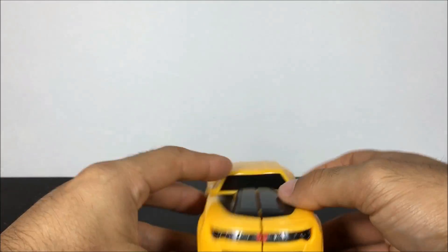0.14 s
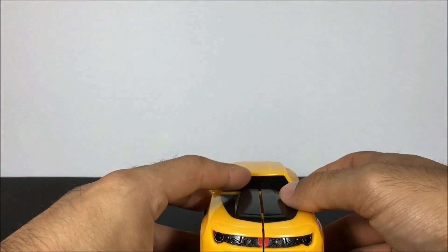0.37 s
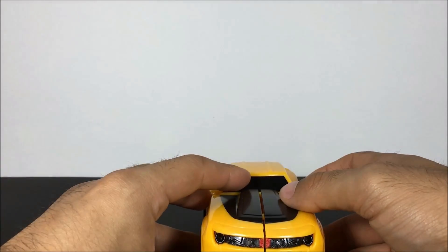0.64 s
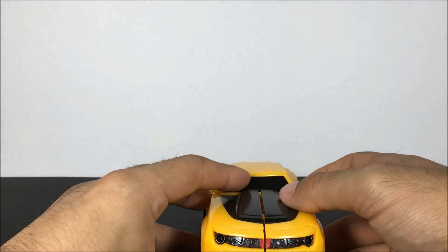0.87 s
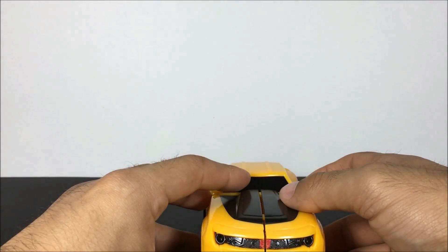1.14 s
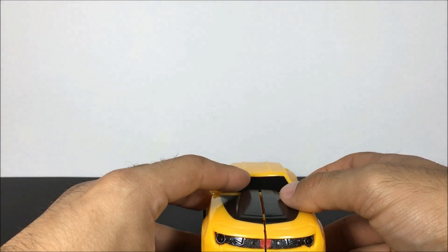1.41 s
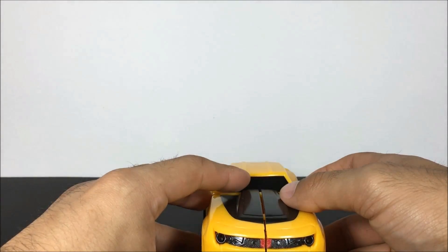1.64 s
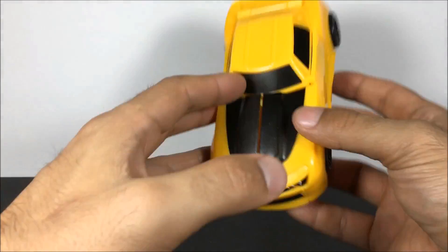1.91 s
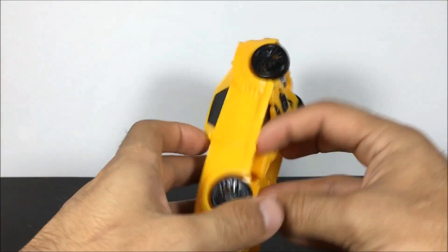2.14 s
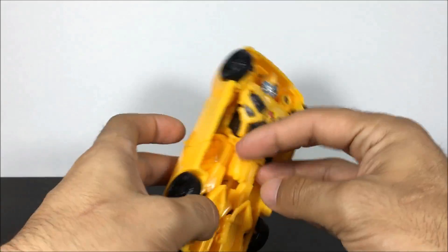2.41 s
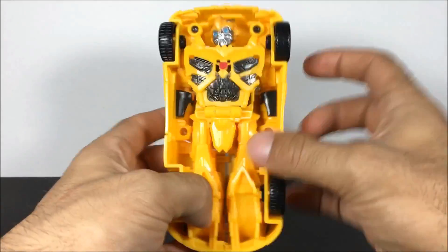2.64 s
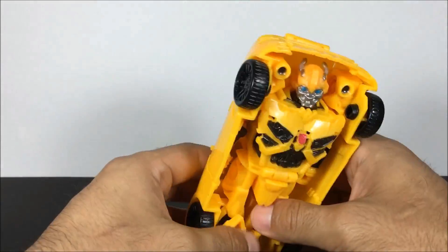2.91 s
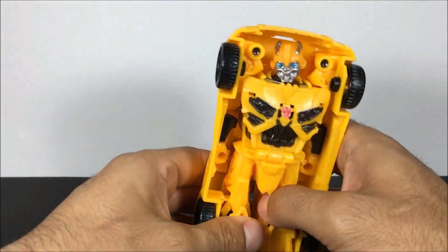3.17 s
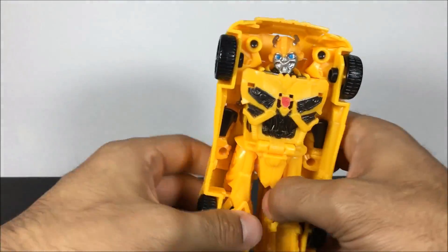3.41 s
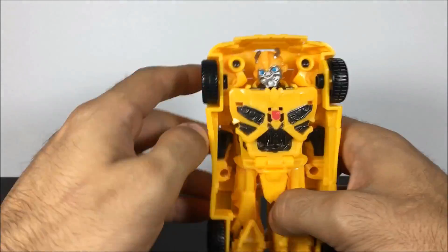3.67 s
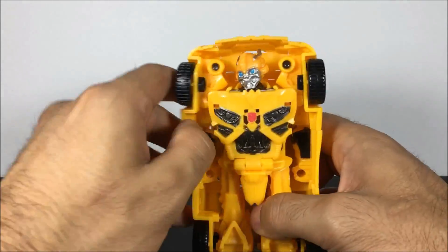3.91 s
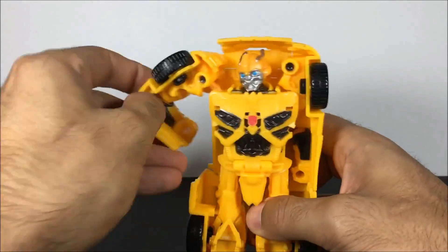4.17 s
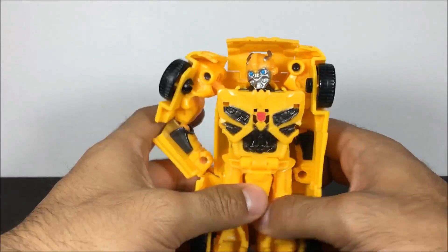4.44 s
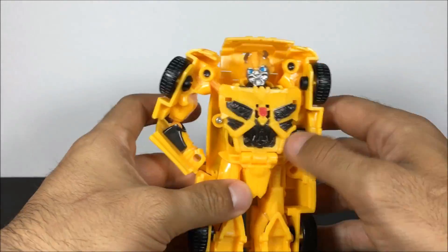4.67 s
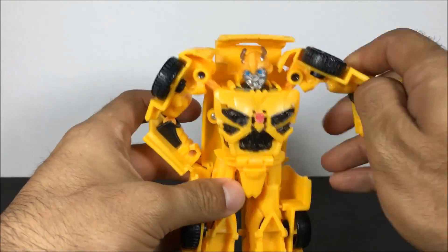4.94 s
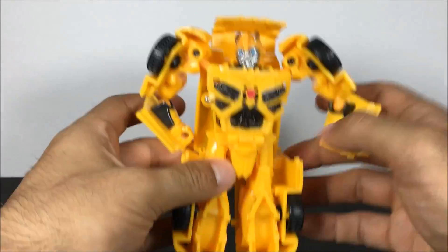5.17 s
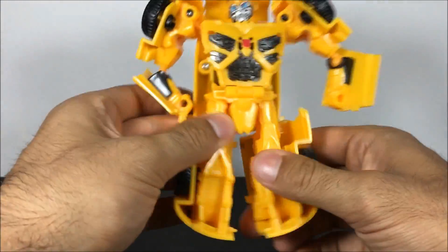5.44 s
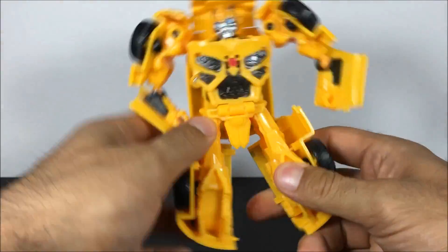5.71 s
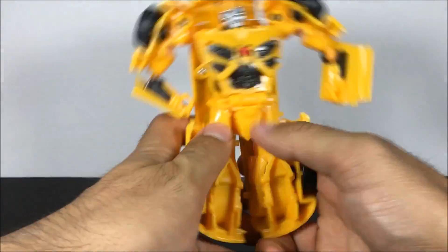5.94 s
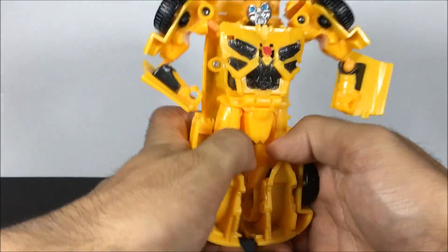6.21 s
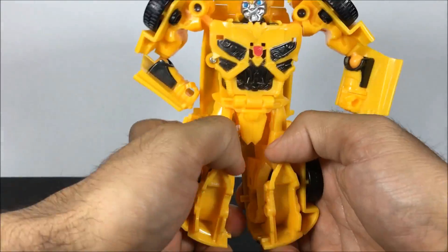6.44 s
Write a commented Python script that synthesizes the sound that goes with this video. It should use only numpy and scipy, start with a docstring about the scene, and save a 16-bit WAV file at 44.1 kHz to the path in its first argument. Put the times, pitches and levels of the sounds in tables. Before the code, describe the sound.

Quiet room hiss, then a plastic clack, a pause, and irregular snaps, scrapes and rattles as stiff toy joints are folded out.

```python
"""Unfolding a plastic toy

Hands unfold a hard plastic toy close to a microphone: joints snap and squeak, loose parts chatter and rub.
Contact noise excites shell and part resonances, with random narrow colouring; jolts ring the table's low modes.
A small quiet room adds a decaying noise tail, hiss and two wavering hums."""
import sys
import numpy as np
from scipy import signal
from scipy.fft import rfft, irfft, next_fast_len
from scipy.io import wavfile
from scipy.ndimage import uniform_filter1d, map_coordinates

SR = 44100
rng = np.random.default_rng(int(sys.argv[2]) if len(sys.argv) > 2 else 0)


def gain_from_db(level_db):
    """Turn a decibel level (scalar or array-like) into a linear amplitude factor."""
    decades = np.asarray(level_db, float) / 20
    return 10 ** decades


def wrap_up_sound(samples):
    """Save the sound to the file named by the first command line argument, as 16-bit audio."""
    columns = np.atleast_2d(samples).T
    # keep every value between -1 and 1, then stretch to whole-number steps
    tamed = np.clip(columns, -1, 1)
    steps = np.round(tamed * 32767).astype(np.int16)
    wavfile.write(sys.argv[1], SR, steps)


N = 290178

# parts and fingers sliding on the shell: start t/s, end t/s, level/dB before fades, ring f/Hz, ring level/dB
STROKES = [(0.192, 0.245, -47.5, 1800, -2), (0.405, 0.732, -65, 2900, -27), (1.923, 2.184, -41, 2280, 3),
           (2.161, 2.353, -36, 3420, 5), (2.23, 2.493, -48.5, 2570, -8), (2.645, 2.818, -46.5, 2700, -8),
           (2.827, 2.93, -42, 5400, -8), (2.883, 2.941, -26.5, 4220, -5), (2.94, 3.067, -43.5, 1340, 6),
           (3.1, 3.31, -57.5, 2430, -6.5), (3.403, 3.79, -60, 2630, -5.5),
           (3.757, 4.093, -54.5, 2590, -7.5), (4.192, 4.313, -29.5, 2930, -6),
           (4.273, 4.404, -51.5, 4050, -3), (4.568, 4.642, -35.5, 3970, -5), (4.6, 5.01, -49, 4050, -8),
           (4.99, 5.258, -48, 3130, 12), (5.184, 5.812, -56.5, 3660, -7), (5.695, 6.088, -52.5, 3840, -22),
           (6.08, 6.353, -49.5, 4000, -6), (6.357, 6.656, -53, 4050, 3.5), (6.318, 6.46, -51.5, 790, 14)]
# resonances of the hollow toy, before the scatter of each spot: f/Hz, width/Hz, level/dB
SHELL_MODES = [(1560, 53, -1.5), (2110, 460, -11.5), (2930, 1480, -2), (4050, 43, -15), (5600, 133, -5.5),
               (8900, 990, -9.5), (11540, 1600, -8)]


def unit(x):
    """Scale to rms 1 along time."""
    return x / np.sqrt(np.mean(x ** 2, -1, keepdims=True) + 1e-20)


def along(points, hz):
    """(Hz, value) points read on a log frequency axis."""
    f, v = np.transpose(points)
    return np.interp(np.log(hz + 1), np.log(f + 1), v)


def wobble(rate_hz):
    """Smooth random curve with rate_hz knots a second."""
    knots = rng.standard_normal(int(N * rate_hz / SR) + 4)
    return map_coordinates(knots, [np.arange(N) * rate_hz / SR])


def filtered(x, response):
    """x times a complex response of frequency."""
    n = x.shape[-1]
    m = next_fast_len(n + 4096)
    return irfft(rfft(x, m) * response(np.fft.rfftfreq(m, 1 / SR)), m)[..., :n]


def resonance(f, centre_hz, width_hz):
    """One causal resonance of gain 1 at its centre."""
    return 1j * f * width_hz / (centre_hz ** 2 - f ** 2 + 1j * f * width_hz)


def air():
    """Steady room noise with two hums: noise through narrow resonances, wavering in level."""
    # room air and microphone hiss: f/Hz, relative level/dB per Hz
    hiss_colour = [(25, 1), (78, -14.5), (130, -9.5), (350, -13.5), (550, -18.5), (1000, -25.5),
                   (3000, -33.5), (15000, -43.5)]
    # building hum: f/Hz, width/Hz of one of two passes, mean level/dB
    hum_bands = [(58.5, 15, -56.5), (99, 10, -60)]
    hiss_db, waver_db, waver_hz = -51, 2, 1.5
    hiss = unit(filtered(rng.standard_normal(N), lambda f: gain_from_db(along(hiss_colour, f))))
    hum = np.zeros(N)
    for centre_hz, width_hz, db in hum_bands:
        gain = gain_from_db(db + waver_db * wobble(waver_hz))
        band = filtered(rng.standard_normal(N), lambda f: resonance(f, centre_hz, width_hz) ** 2)
        hum += gain * unit(band)
    return gain_from_db(hiss_db) * hiss + hum


def shell(f, shares_db, detune, between_db=-11):
    """The toy's resonances over a flat floor, each at the share and pitch this contact gives it."""
    modes = 0
    for k, (centre_hz, width_hz, db) in enumerate(SHELL_MODES):
        mode = resonance(f, centre_hz * detune[..., k, None], width_hz)
        modes = modes + gain_from_db(db + shares_db[..., k, None]) * mode
    return gain_from_db(between_db) + modes


def plastic(excitation, tilt_db, variety=1):
    """The shell colours each row of contact noise; every spot touched favours other resonances."""
    # broad colour of hard plastic in contact: f/Hz, relative level/dB per Hz
    contact_colour = [(300, -21.5), (600, -10.5), (1000, -5.5), (1500, -13), (3000, -9), (6000, -3.5),
                      (10000, -10.5), (15000, -15)]
    scatter_db, detune_share = 5.5, 0.04
    shares, bends = rng.standard_normal((2,) + excitation.shape[:-1] + (len(SHELL_MODES),))

    def response(f):
        colour_db = along(contact_colour, f) + tilt_db * np.log2((f + 300) / 3500)
        return shell(f, variety * scatter_db * shares, 1 + detune_share * bends) * gain_from_db(colour_db)

    return filtered(excitation, response)


def ring(excitation, ring_hz, sharpness):
    """The touched part's own resonance, applied twice for steep flanks."""
    return filtered(excitation, lambda f: resonance(f, ring_hz, ring_hz / sharpness) ** 2)


def rubbing():
    """Strokes scrape the shell, and uneven stick-slip chirps ring the touched part."""
    grain_db = 4.5 * wobble(350) + 4.5 * wobble(70)
    slip_noise, scrape_noise = rng.standard_normal((2, N))
    slips = unit(gain_from_db(11 * np.tanh(1.5 * wobble(220) - 1)) * slip_noise)
    out = np.zeros(N)
    for start_s, end_s, db, ring_hz, ring_db in STROKES:
        span = slice(round(start_s * SR), min(round(end_s * SR), N))
        hardness = np.clip(1.5 + ring_db / 12, 0.25, 1)  # skin slides smoothly and hardly rings the part
        scrape = unit(gain_from_db(hardness * grain_db[span]) * scrape_noise[span])
        tilt_db = -1.5 - 0.18 * ring_db  # per octave; strokes that ring more are duller
        stroke = plastic(scrape, tilt_db, variety=0.28)
        stroke += gain_from_db(ring_db) * ring(slips[span], ring_hz, sharpness=4.7)
        out[span] += gain_from_db(db) * unit(stroke) * signal.windows.tukey(len(stroke), 0.6)
    return out


def room(x):
    """Noise tails in which each frequency dies at its own speed; a fresh tail every quarter second."""
    # reverberation: f/Hz, t60/s
    walls = [(300, 0.45), (2000, 0.35), (10000, 0.1)]
    out, step, delay = np.zeros(N + SR), SR // 4, 130  # samples
    for start in range(0, N, step):
        hz, t, z = signal.stft(rng.standard_normal(SR // 3), SR, nperseg=256)
        decay = gain_from_db(-60 * t / along(walls, hz)[:, None])
        tail = signal.istft(z * decay, SR, nperseg=256)[1]
        wet = signal.fftconvolve(x[start:start + step], tail / np.linalg.norm(tail))
        out[start + delay:][:len(wet)] += wet
    return out[:N]


def ticks(count):
    """Random small contacts of loose parts as rows for clicks(), scattered about the loudest stroke under way."""
    over_stroke_db, scatter_db, ring_scatter_oct, tilt_scatter_db = 3, 3.5, 0.5, 3.5
    start_s, end_s, db, ring_hz, _ = np.transpose(STROKES)[:, :, None]
    s = (np.arange(count) + rng.random(count)) * N / SR / count
    chance = rng.standard_normal((count, 3))
    progress = np.clip((s - start_s) / (end_s - start_s), 0, 1)
    swell = np.clip(np.sin(np.pi * progress), 1e-4, 1)
    under_db = db + 20 * np.log10(swell)
    pitch_hz = ring_hz[under_db.argmax(0), 0] * 2 ** (ring_scatter_oct * chance[:, 0])
    level_db = under_db.max(0) + over_stroke_db + scatter_db * chance[:, 1]
    return np.transpose([s, level_db, pitch_hz, tilt_scatter_db * chance[:, 2]])


def narrow_modes(blow, tilt_db, count=6):
    """Random narrow resonances colour every blow, new pitches each time."""
    middle_hz, spread_oct, sharpness = 3021, 1.1, 20.2
    octaves = spread_oct * rng.standard_normal((len(blow), count))
    pitch_hz = np.clip(middle_hz * 2 ** octaves, 500, 14000)
    gain = gain_from_db(tilt_db * np.log2(pitch_hz / 3500))

    def response(f):
        modes = 0
        for k in range(count):
            hz = pitch_hz[:, k, None]
            modes = modes + gain[:, k, None] * resonance(f, hz, hz / sharpness)
        return modes

    return filtered(blow, response)


def clicks(contacts):
    """Each contact: a short scrape leads in, a blow of a few ms, then a duller clumped chatter."""
    s, db, ring_hz, tilt_db = np.transpose(contacts)[:, :, None]
    size, lead = 3072, 512  # samples
    t = (np.arange(size) - lead) / SR
    after = np.maximum(t, 0)
    chance = rng.standard_normal((len(contacts), 3, size))

    rise_s = 0.0015 * gain_from_db(chance[:, 2, :1] + 0.99 * np.minimum(tilt_db, 0))  # dull knocks are briefest
    strike = (1 - np.exp(-4 * after / rise_s)) * np.exp(-after / (2 * rise_s))
    lead_in = gain_from_db(-22 + 60 * t / 0.018) * (t < 0)
    blow = chance[:, 0] * (strike + lead_in)

    # loose parts bounce unevenly
    clumps = gain_from_db(10 * np.tanh(0.4 * unit(uniform_filter1d(chance[:, 2], size=70))))
    chatter_t60_s = np.clip(0.1 + 0.003 * (db + 11), 0.03, 0.12)  # harder blows chatter for longer
    chatter_env = (1 - np.exp(-after / 0.00055)) * gain_from_db(-7.5 + 0.17 * tilt_db - 60 * after / chatter_t60_s)
    chatter = chance[:, 1] * chatter_env * clumps

    ring_gain = gain_from_db(4.0 + tilt_db * np.log2(ring_hz / 3500))
    rows = plastic(blow, tilt_db)
    rows += ring_gain * ring(blow, ring_hz, sharpness=5.7 * (ring_hz / 3500) ** 1.04)
    rows += gain_from_db(-5.5) * narrow_modes(blow, tilt_db)
    # harder blows are crisper at the top
    rows = filtered(rows, lambda f: gain_from_db(0.5 * (db + 11.5) * (f / 12000) ** 2))
    peak = np.sqrt(np.abs(uniform_filter1d(rows ** 2, size=60)).max(1, keepdims=True))  # short-term rms
    rows += plastic(chatter, 0.52 * tilt_db - 2.5)
    at = np.round(s * SR).astype(int) - lead + np.arange(size)
    return np.bincount(np.maximum(at, 0).ravel(), (rows * gain_from_db(db) / peak).ravel(), N + size)[:N]


def jolts():
    """A soft push rings the table's low modes, at new strengths and pitches each time; the stand shudders on."""
    # jolts into the table: t/s, thud peak level/dB
    pushes = [(0.291, -24), (2.293, -15), (2.355, -27), (2.924, -15.5), (2.986, -30.5), (3.764, -25),
              (3.907, -30.5), (4.272, -23.5), (4.693, -30), (5.174, -35.5)]
    # table and microphone stand, before scatter: f/Hz, level/dB, t60/s
    table_modes = [(69, -4.5, 0.077), (116.9, 3, 0.073), (207, -1, 0.035)]
    t, out = np.arange(SR // 4) / SR, np.zeros(N + SR)
    hz, level_db, t60_s = np.transpose(table_modes)[:, :, None]
    for s, db in pushes:
        shares, detune = rng.standard_normal((2, len(table_modes), 1))
        decay = gain_from_db(level_db + 2.6 * shares - 60 * t / t60_s)
        modes = decay * np.sin(2 * np.pi * hz * (1 + 0.03 * detune) * t)
        thud = modes.sum(0) * (1 - np.exp(-t / 0.0031))
        tail = gain_from_db(-60 * t / 0.45) * rng.standard_normal(len(t))
        shudder = signal.fftconvolve(thud, tail)[:len(t)]
        jolt = thud / np.abs(thud).max() + gain_from_db(-12.5) * shudder / np.abs(shudder).max()
        out[round(s * SR):][:len(t)] += gain_from_db(db) * jolt
    return out[:N]


def squeaks():
    """A stiff joint slips at one pitch: each slip is a soft puff of friction noise into one narrow ring."""
    # slips of the joint: t/s, peak level/dB
    slip_events = [(4.713, -28.5), (4.748, -36), (4.798, -23.5), (4.87, -34), (4.887, -31), (4.924, -35),
                   (4.933, -27), (4.977, -45)]
    squeak_hz, rise_s = 4050, 0.0018
    out, t = np.zeros(N + SR), np.arange(2048) / SR
    puffs = rng.standard_normal((len(slip_events), len(t))) * t * np.exp(-t / rise_s)
    for (s, db), chirp in zip(slip_events, ring(puffs, squeak_hz, sharpness=17.0)):
        out[round(s * SR):][:len(t)] += gain_from_db(db) * chirp / np.abs(chirp).max()
    return out[:N]


def scene():
    """Toy, its reverberation, table and room."""
    # distinct snaps and contacts: t/s, peak short-term level/dB of the blow, part ring f/Hz, tilt/dB per octave
    snaps = [(0.2066, -37.5, 2480, 3), (0.2473, -30.5, 1480, 1.5), (0.2826, -14.5, 1360, -10),
             (0.2856, -12.5, 5360, 3), (0.3024, -18, 1370, -1), (0.309, -21.5, 1620, -10),
             (0.3358, -27, 2040, 1.5), (0.3595, -34.5, 1880, 4), (0.3806, -31.5, 2920, 5),
             (0.4595, -42, 2700, -2.5), (1.88, -34.5, 1930, -5.5), (1.9006, -31.5, 2000, -1),
             (1.9223, -31.5, 5500, 1.5), (1.9679, -23.5, 5600, 4.2), (1.9797, -19.5, 5600, 0.5),
             (1.9989, -29, 1560, 2.5), (2.0452, -28.5, 1600, 1.5), (2.078, -28.5, 6460, 5),
             (2.0849, -24.5, 2110, 1.5), (2.1074, -28.5, 3530, 7.5), (2.226, -22, 3560, 0.5),
             (2.2507, -19.5, 2170, -2), (2.2875, -11.5, 2720, 1.5), (2.337, -22.5, 2230, -0.5),
             (2.363, -18.5, 5280, 1.5), (2.5856, -35, 3140, -0.5), (2.7172, -19, 1880, 3.5),
             (2.7332, -27.5, 3570, 4.5), (2.8615, -34, 5480, -7), (2.9049, -17, 4200, 8),
             (2.9159, -14.5, 1240, -3.5), (2.935, -16.5, 5300, 1), (3.038, -34, 3760, -3),
             (3.054, -26.5, 2480, 3), (3.0921, -24, 5460, -2), (3.138, -35.5, 2500, -2),
             (3.3896, -27, 3730, -1), (3.5544, -40, 2470, 4), (3.7578, -26, 1250, -1),
             (3.7646, -28, 2690, 3.5), (3.7806, -29.5, 5700, -1), (3.8577, -31.5, 3840, -2),
             (3.8785, -31, 5960, 7.5), (3.904, -27.5, 1380, -18), (3.9585, -41.5, 1570, -3.5),
             (3.9934, -35.5, 5840, 1), (4.087, -28, 2830, -2.5), (4.1187, -28, 3500, -6),
             (4.1473, -31.5, 2920, 1.5), (4.1985, -31.5, 3940, -2), (4.222, -24, 2600, 4.5),
             (4.2613, -17, 2820, -0.5), (4.2765, -21, 5500, 3), (4.2902, -26, 2800, 1),
             (4.5432, -17, 3070, 0.5), (4.579, -27, 2400, -6), (4.5904, -17, 2440, -0.8),
             (4.611, -29, 3860, -1), (4.6215, -30.5, 3900, 3), (4.6915, -20, 5820, 0),
             (4.7669, -28, 1480, 3), (4.8016, -28.5, 4050, 7), (4.8695, -27.5, 4000, -2),
             (4.9158, -33, 4040, 4.5), (4.9537, -29, 3480, -3.5), (4.994, -10, 3740, -1.6),
             (5.0164, -18, 2990, 4.5), (5.0731, -24, 3840, -0.5), (5.0805, -29, 5800, 2),
             (5.095, -30.5, 3100, 8), (5.1195, -30, 2920, 0), (5.157, -33, 5400, 11),
             (5.1696, -31.5, 1140, 0.5), (5.2645, -43.5, 4450, 9), (5.3546, -33, 4160, 11.5),
             (5.4687, -25.5, 3180, 4.5), (5.478, -26, 3930, 0), (5.4996, -33.5, 4050, 6),
             (5.6162, -25.5, 4080, 7), (5.889, -33, 3270, 1.5), (5.9003, -36, 5630, 16),
             (5.9632, -40.5, 3480, 1), (6.0459, -31, 3560, -7), (6.0735, -26, 3870, -0.5),
             (6.0953, -24.5, 3950, -3.5), (6.1335, -24, 5500, 1), (6.1987, -25.5, 3660, -8.5),
             (6.205, -18, 4550, 9.5), (6.261, -36, 4560, 6), (6.3118, -24, 3380, -9),
             (6.355, -41.5, 4430, 4), (6.47, -38.5, 4300, 15), (6.5173, -41, 4000, -9.5)]
    toy = clicks(snaps) + clicks(ticks(count=450)) + rubbing() + squeaks()
    return (toy + gain_from_db(-14.5) * room(toy) + jolts() + air())[None]


def low_pass(x):
    """Removes everything above the highest recorded frequency."""
    return signal.sosfilt(signal.butter(12, 16630, fs=SR, output="sos"), x)


def record(dry):
    """The microphone chain drops the deepest bass and falls steeply above 15.3 kHz."""
    hz = [25, 50, 15300, 15500, 16700]
    gain_db = [-12.5, -1.5, -2.5, -39.0, -84.0]
    heard = filtered(dry, lambda f: gain_from_db(np.interp(f, hz, gain_db)))
    return low_pass(heard)


dry = scene()
out = record(dry)
wrap_up_sound(out)
```